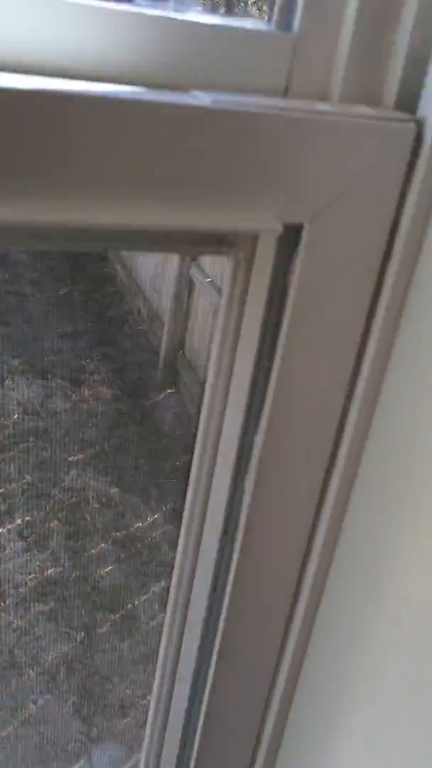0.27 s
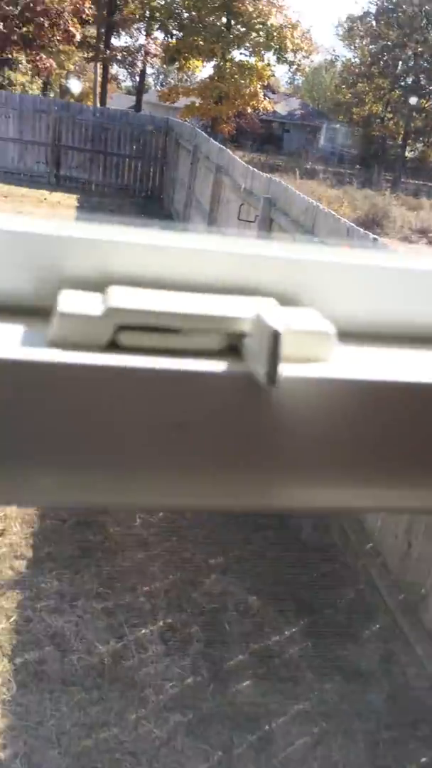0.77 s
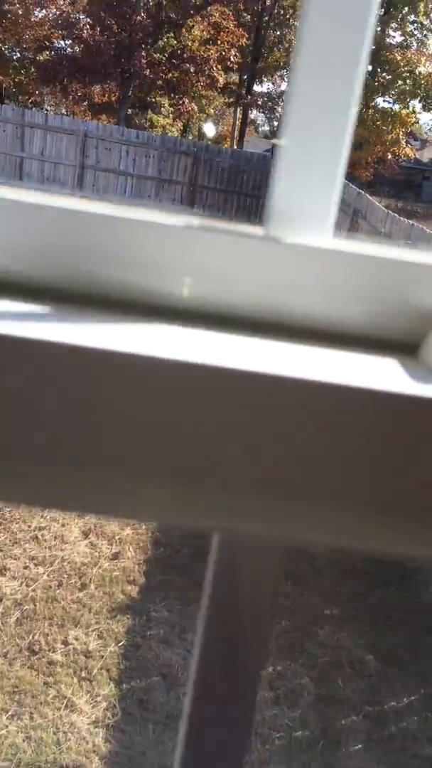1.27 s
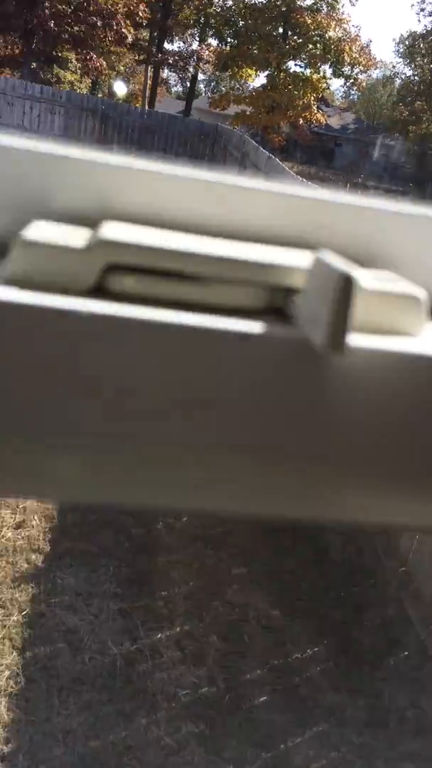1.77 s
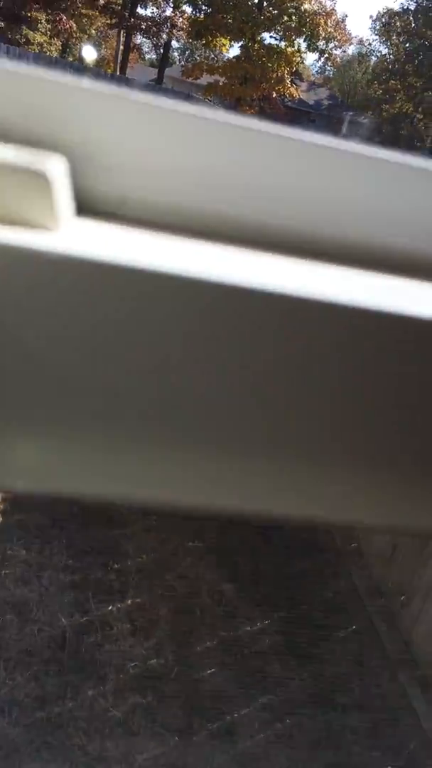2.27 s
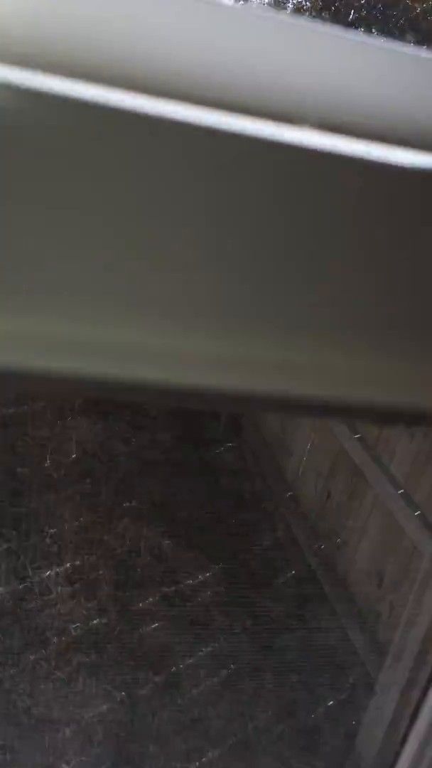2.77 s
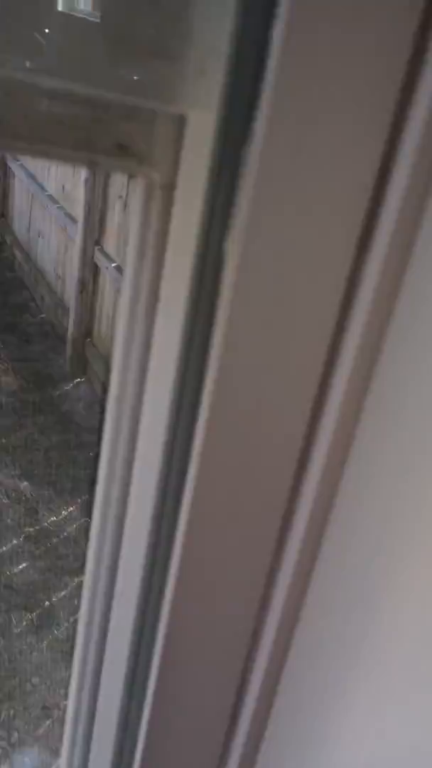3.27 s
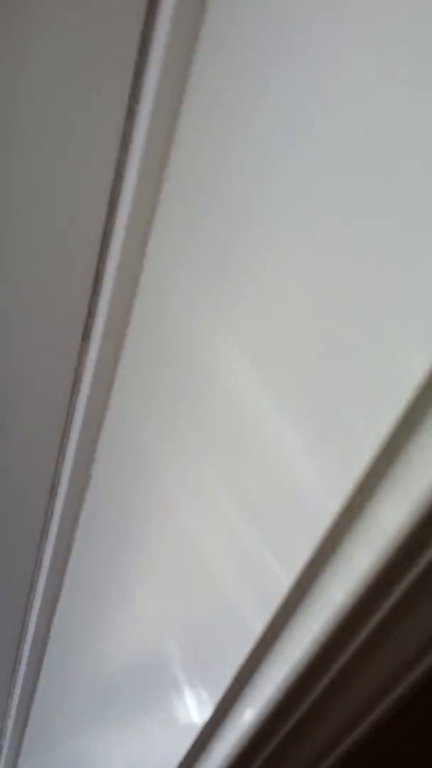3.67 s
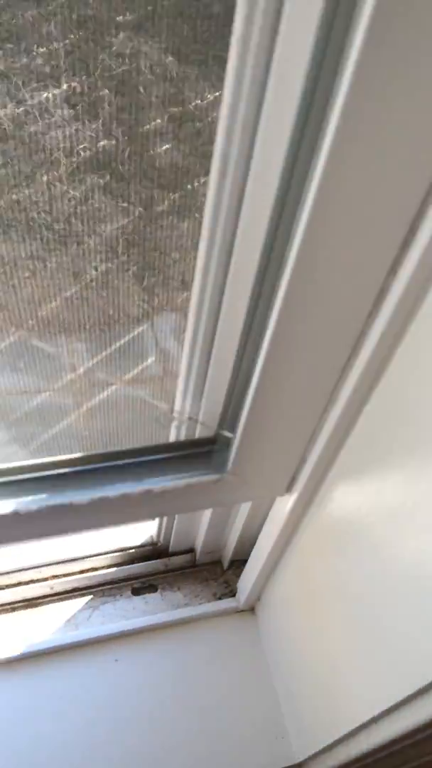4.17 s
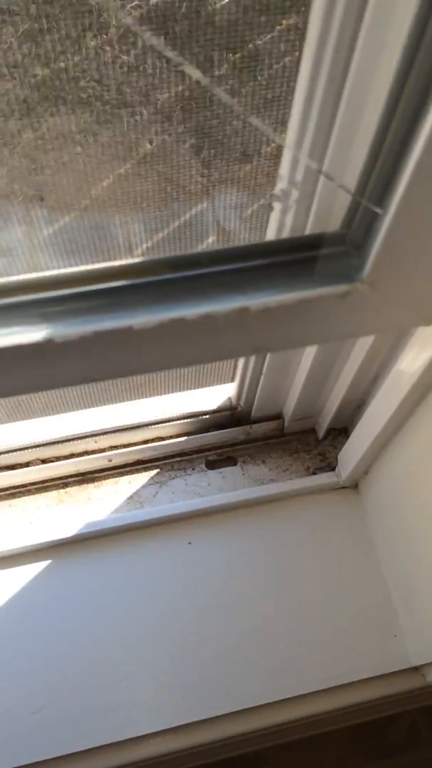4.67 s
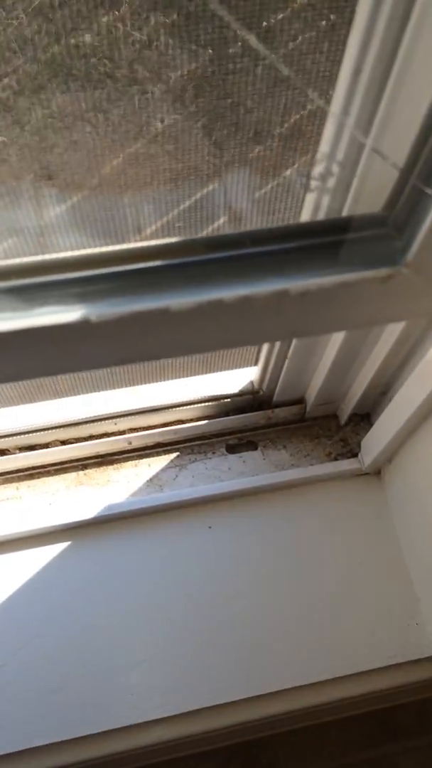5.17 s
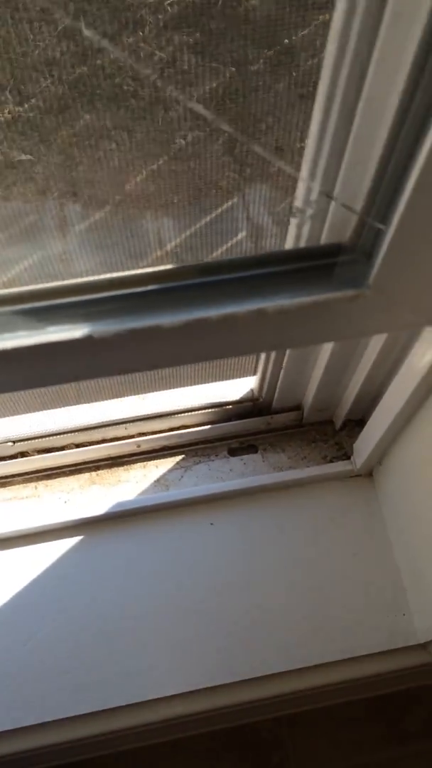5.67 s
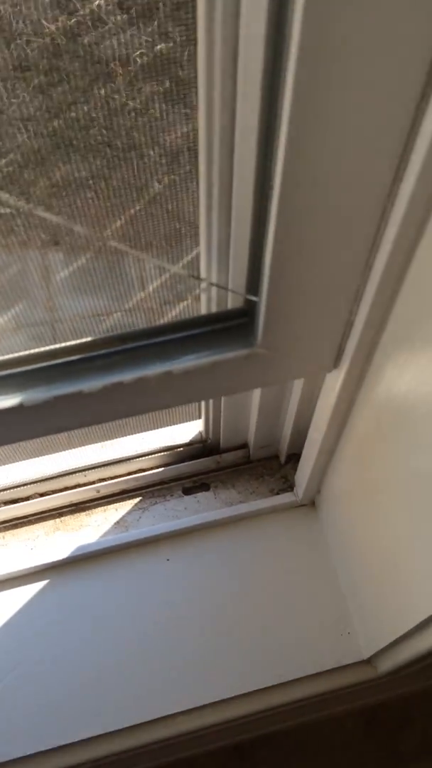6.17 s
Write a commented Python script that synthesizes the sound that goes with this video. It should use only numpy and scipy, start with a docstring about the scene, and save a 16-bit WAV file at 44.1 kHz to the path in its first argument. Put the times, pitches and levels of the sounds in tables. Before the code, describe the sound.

A vinyl sash window is opened by hand, heard close up in a small room over a faint appliance hum and distant traffic. A tiny tick comes at 0.7 seconds and a light click at 1.5, with soft rubs of hand and sleeve. The latch clacks sharply at about 1.9 seconds, followed by smaller clicks and a hard double knock near 2.7. Around 2.9 to 3 seconds the tight sash breaks free in the loudest cluster of knocks, shuddering briefly while the glass rings faintly. It slides along its track with a soft, hissing scrape from 3 to 3.8 seconds, knocking once at 3.6 and stopping with a gentle bump. Then the room is nearly quiet, the traffic murmur slightly fuller than at first. A light click and a soft thump of the pane come around 5.6 seconds, and a few more ticks at 6.2.

```python
"""Opening a sash window

A vinyl sash window is worked by hand in a small room, heard close up and in mono. The latch clicks and
the sash knocks free: each impact excites the resonances of frame, glass and room. Friction gives the
rest of the motion its sound: the sash shudders, its brush seal hisses along the track, and it bumps to
rest. Light ticks of the frame follow. Behind it an appliance hums and distant traffic murmurs."""
import sys
import numpy as np
from scipy import signal
from scipy.fft import rfft, irfft
from scipy.io import wavfile

SR = 44100
rng = np.random.default_rng(int(sys.argv[2]) if len(sys.argv) > 2 else 0)


def waveform_to_disk(signal):
    """Save audio, clipped to [-1, 1], as 16-bit WAV at the path in sys.argv[1]."""
    frames = np.transpose(np.atleast_2d(signal))
    scaled = np.clip(frames, -1, 1) * 32767
    samples = np.round(scaled).astype(np.int16)
    wavfile.write(sys.argv[1], SR, samples)


N = 282681
TIME = np.arange(N) / SR

# noise spectra, each (frequency [Hz], relative spectral density [dB])
AIR_SPECTRUM = [(50, 3), (100, 2.5), (200, 0.5), (260, -6), (350, -4), (600, -14.5), (1100, -19.5),
                (1450, -16.5), (2400, -24), (4200, -27.5), (5300, -26), (6700, -29), (9000, -32.5),
                (15000, -36)]   # still room air
TRAFFIC_SPECTRUM = [(90, -2), (200, 1), (300, -4.5), (500, -11), (720, -10), (900, -19.5), (1200, -35)]   # distant traffic
RUB_SPECTRUM = [(800, 4), (2500, -1.5), (6000, -3), (10500, -7), (12500, -9.5), (15000, -11)]   # light rubs and the closing burst
BOLT_SPECTRUM = [(200, 5.5), (400, 4.5), (850, 5), (1800, 0.5), (4000, -6.5), (10000, -7.5), (15000, -8)]   # latch bolt in its slot
CREEP_SPECTRUM = [(300, 6.5), (480, 6), (800, 3.5), (1500, -3), (3400, -6.5), (7000, -19)]   # tight sash giving way
SHUDDER_SPECTRUM = [(60, -3), (180, 3), (400, 2), (600, -6), (1000, -0.5), (2000, -7), (4000, -18.5)]   # loose sash shaking
SCRAPE_SPECTRUM = [(400, -7), (800, -1.5), (1300, 3), (2600, 3.5), (4500, 2), (7000, -13.5)]   # sash on its track
BRISTLE_SPECTRUM = [(3000, -7), (4500, -3.5), (7000, -1), (10000, -1.5), (12500, -3.5), (15000, -6)]   # brush seal
# motor and mains hum: (frequency [Hz], rms level [dB])
HUM_PARTIALS = [(48.5, -62.5), (59.3, -64.5), (147, -78), (195, -70), (294.5, -70.5), (365.5, -74.5),
                (414, -81.5), (472, -81.5), (1302, -85.5), (1833, -87), (5028, -91), (12532, -99.5)]
# spells of whining: (start [s], end [s], frequency [Hz], rms level [dB])
WHINE_SPELLS = [(0, 0.419, 1895, -74.5), (1.2, 2.401, 1885, -78.5), (3.501, 3.922, 1895, -77.5),
                (5.902, 6.4, 1898, -81.5), (.6, 1.05, 1477, -79.5), (3.7, 4.7, 1477, -78),
                (5.802, 6.302, 1486, -77.5)]
# gain of the reverberation: (frequency [Hz], gain [dB])
REVERB_GAIN = [(100, 4.5), (300, 7.5), (600, -7.5), (1300, -5.5), (3300, -10), (6000, -14.5),
               (14000, -12.5)]
# reverberation time: (frequency [Hz], time to fall 60 dB [s])
REVERB_T60 = [(100, 0.22), (400, 0.92), (1500, 0.27), (4000, 0.38), (8000, 0.2), (14000, 0.277)]
# light rubs of hand and sleeve; the last row is a brief burst of noise at the very end:
# (start [s], end [s], level [dB])
LIGHT_RUBS = [(0, 0.067, -72.5), (0.568, 0.762, -68.5), (1.48, 1.655, -64), (1.77, 1.777, -71.5),
              (1.884, 2.03, -65.5), (2.217, 2.23, -72), (2.454, 2.638, -64), (5.42, 5.559, -74),
              (5.623, 5.652, -65.5), (6.005, 6.08, -67.5), (6.21, 6.254, -72), (6.409, 6.41, -54)]
# long, faint modes of the glass: (frequency [Hz], bandwidth [Hz], gain [dB])
GLASS_MODES = [(335, 8, 9), (455, 5, 15), (717, 7, 3), (985, 9, -2), (1315, 12, -6), (1883, 12, -5),
               (3333, 14, -6)]
# soft bumps of the pane: (time [s], level [dB], frequency [Hz], time to fall 60 dB [s])
PANE_BUMPS = [(2.098, -40.5, 117, 0.08), (3.029, -34.5, 77.6, 0.078), (3.59, -36, 275, 0.1),
              (3.812, -37.5, 136, 0.063), (5.678, -36, 115, 0.068)]
# resonances and dips of the hollow frame: (frequency [Hz], bandwidth [Hz], gain [dB])
FRAME_RESONANCES = [(1320, 150, 3), (1920, 180, 3), (2310, 150, 2), (3330, 140, 3.5), (3720, 200, 2.5),
                    (4400, 300, -3), (5000, 220, 3), (5650, 400, -3), (6450, 300, 2.5), (8200, 500, 3)]
# thud, knock, clack, crack and snap bands of an impact: (lower edge [Hz], upper edge [Hz])
IMPACT_BANDS = [(120, 600), (600, 1200), (1200, 2600), (2600, 6500), (6500, 14500)]
# band balance of a firm knock and a light tick: (thud [dB], knock [dB], clack [dB], crack [dB], snap [dB])
FIRM_BALANCE = (-6, -1, 2, 1.5, -16)
LIGHT_BALANCE = (0.5, 2, -1, -4, -14)
# a harder contact trades thud for snap: (change in each band [dB per dB of hardness])
TILT_PER_HARDNESS = (-1.27, -0.78, 0, 1.11, 2)
# knocks and ticks of latch, sash and frame:
# (time [s], strength [dB], hardness [dB], lower ring [Hz], upper ring [Hz], chatter time [s])
IMPACTS = [(0.6664, -25, 6.5, 1500, 3050, 0.0017), (1.4705, -12, 3.5, 1000, 3550, .005),
           (1.541, -19.5, -3.5, 1040, 2780, 0.0022), (1.8985, -11.5, -0.5, 1500, 5970, 0.0059),
           (1.9263, 2.5, -2.6, 1370, 1760, .004), (1.9351, -7, -5.5, 1000, 1500, 0.0032),
           (1.9593, -7.5, 8.5, 1190, 4600, 0.00038), (1.9619, -4, -3, 950, 4560, 0.0023),
           (2.216, -22, 1.8, 1880, 5570, 0.0037), (2.434, -27, -4, 1000, 4540, 0.0037),
           (2.451, -11.5, -3.5, 1310, 2600, 0.0041), (2.504, -26, 3, 1500, 5100, .003),
           (2.6544, -.5, -0.5, 1582, 3290, 0.0065), (2.6673, 0.5, 0.74, 1530, 4620, 0.0022),
           (2.671, -4.5, .3, 1618, 3230, .0055), (2.9168, -7.5, -1, 1240, 3345, 0.008),
           (2.929, -7.5, -4.5, 1300, 3000, 0.0083), (2.9466, 5, 1.5, 1180, 3280, 0.0049),
           (2.9486, 9, 3.5, 1910, 3700, 0.002), (2.981, 4.5, 1, 2300, 4170, 0.003),
           (2.985, 2, 3, 1090, 5800, .003), (2.998, -1.5, -3, 730, 3230, 0.01),
           (3.0337, -5.5, -2.5, 1010, 2760, 0.012), (3.5799, -7.5, -5.5, 1930, 2460, 0.0057),
           (3.809, -22.5, -8, 1050, 2705, 0.0039), (4.243, -29, -8, 750, 2700, .004),
           (4.272, -32, 0, 1490, 5030, .0063), (5.6106, -13.5, -1.3, 800, 2960, 0.0021),
           (5.719, -19.5, -1.5, 2190, 4220, 0.0058), (6.208, -15.5, -3.5, 910, 4130, 0.0023),
           (6.218, -19, -3, 1520, 3000, .004), (6.248, -24, -0.5, 1510, 3030, .0087)]
# speed of the sash, as the level of its hiss: (time [s], relative level [dB])
SASH_SPEED = [(3.03, -48), (3.152, -46.5), (3.378, -51.5), (3.702, -52), (3.766, -54.5), (3.824, -69),
              (3.86, -75.5)]


def from_db(db):
    """Amplitude ratio of a level in decibels."""
    return 10 ** (np.asarray(db) / 20)


def at_hz(curve, hz):
    """Interpolation on a logarithmic frequency axis."""
    frequencies, values = np.transpose(curve)
    return np.interp(np.log(hz), np.log(frequencies), values)


def band(x, low, high, order=2):
    """Butterworth band-pass filtering, with edges in hertz."""
    sections = signal.butter(order, [low, min(high, .47 * SR)], "band", fs=SR, output="sos")
    return signal.sosfilt(sections, x)


def resonance(x, hz, width, db):
    """A second-order resonance lifts or hollows one region of the spectrum."""
    cosine, gain = np.cos(2 * np.pi * hz / SR), from_db(db)
    k = np.pi * width / SR
    return signal.lfilter([1 + k * gain, -2 * cosine, 1 - k * gain], [1 + k, -2 * cosine, 1 - k], x)


def unit_rms(x):
    """Normalisation to unit power."""
    return x / np.sqrt(np.mean(x ** 2) + 1e-20)


def noise(spectrum):
    """Spectral shaping of white noise, at unit power and rolled off beyond the ends of the table."""
    hz = np.arange(N // 2 + 1) * SR / N + 0.00088
    low, high = spectrum[0][0], spectrum[-1][0]
    roll_off = 1 / np.sqrt((1 + (.8 * low / hz) ** 8) * (1 + (.8 * hz / high) ** 8))
    white = rfft(rng.standard_normal(N))
    return unit_rms(irfft(white * from_db(at_hz(spectrum, hz)) * roll_off, N))


def drift(rate_hz):
    """Random modulation: Gaussian values joined by straight lines."""
    return np.interp(TIME * rate_hz, np.arange(4096), rng.standard_normal(4096))


def friction(spectrum, db, grain_db, grain_hz):
    """Uneven rubbing contact gives noise whose level fluctuates at random."""
    return from_db(db + grain_db * drift(grain_hz)) * noise(spectrum)


def swell(start_s, end_s, rise_s, fall_s):
    """Exponential growth and decay about a hold; rise and fall are the times for 60 dB."""
    away = np.maximum(start_s - TIME, 0) / rise_s + np.maximum(TIME - end_s, 0) / fall_s
    return from_db(-60 * np.minimum(away, 3))


def tone(hz):
    """A sinusoid of unit power with slight random phase modulation."""
    return np.sqrt(2) * np.sin(2 * np.pi * (hz * TIME + rng.random()) + .12 * drift(4))


def air_and_traffic(air_db=-60.5, traffic_rise_s=(1.95, 2.9), traffic_db=(-69.5, -58.5)):
    """Ambient noise: over steady air, distant traffic swells while latch and sash are worked loose."""
    air = from_db(air_db) * noise(AIR_SPECTRUM)
    traffic = from_db(np.interp(TIME, traffic_rise_s, traffic_db)) * noise(TRAFFIC_SPECTRUM)
    return air + traffic


def appliance():
    """Superposed tones: a motor beats against the mains hum."""
    return sum(from_db(db) * tone(hz) for hz, db in HUM_PARTIALS)


def whines(fade_s=2.5):
    """Slow amplitude modulation: two faint whines swell and fade across the room."""
    return sum(from_db(db) * swell(start, end, fade_s, fade_s) * tone(hz)
               for start, end, hz, db in WHINE_SPELLS)


def room(x, first_echo_s=0.0017, build_s=0.0059):
    """Reverberation: a diffuse field builds after the first echo and lasts longest in the low middle."""
    t, response = TIME[:SR], 0
    onset = 1 - np.exp(-np.maximum(t - first_echo_s, 0) / build_s)
    edges = np.geomspace(60, 16000, 13)
    for low, high in zip(edges, edges[1:]):
        hz = np.sqrt(low * high)
        decay = from_db(-60 * t / at_hz(REVERB_T60, hz))
        tail = band(rng.standard_normal(SR), low, high, order=3) * onset * decay
        gain = from_db(at_hz(REVERB_GAIN, hz)) * np.sqrt(2 * (high - low) / SR)
        response = response + gain * tail / np.linalg.norm(tail)
    return signal.fftconvolve(x, response)[:N]


def rubs():
    """Light friction of hand and sleeve; a brief burst of the same noise sounds at the very end."""
    envelope = sum(from_db(db) * swell(start, end, rise_s=.14, fall_s=.74)
                   for start, end, db in LIGHT_RUBS)
    return envelope * friction(RUB_SPECTRUM, db=0, grain_db=2, grain_hz=90)


def glass(blows):
    """Modal resonance: the glass rings on faintly after each blow."""
    ringing = 0
    for hz, width, db in GLASS_MODES:
        radius = np.exp(-np.pi * width / SR)
        poles = [1, -2 * radius * np.cos(2 * np.pi * hz / SR), radius ** 2]
        ringing += from_db(db) * signal.lfilter([1 - radius, 0, radius - 1], poles, blows + 1e-18)
    return ringing


def pane(rise_s=0.002):
    """Damped free vibration: the heavy pane swings briefly after a push."""
    bumps = 0
    for start, db, hz, t60 in PANE_BUMPS:
        t = np.maximum(TIME - start, 0)
        envelope = from_db(db - 60 * np.minimum(t / t60, 3)) * (1 - np.exp(-t / rise_s))
        bumps = bumps + envelope * np.sin(2 * np.pi * hz * t)
    return bumps


def bolt(spread_db=-13):
    """Dry friction: the latch bolt rasps in its slot. Rows: direct sound, feed to glass and room."""
    envelope = swell(1.9125, 1.92, rise_s=.011, fall_s=.04)
    rasp = envelope * friction(BOLT_SPECTRUM, db=-33.5, grain_db=3, grain_hz=900)
    return np.array([rasp, rasp * from_db(spread_db)])


def creep():
    """Frictional creep: the tight sash grinds dully as it starts to give under the push."""
    envelope = swell(2.7, 2.92, rise_s=.11, fall_s=.091)
    return envelope * friction(CREEP_SPECTRUM, db=-55.5, grain_db=1.5, grain_hz=150)


def shudder():
    """Intermittent contact: the loose sash rattles in the frame as it comes free."""
    envelope = swell(2.99, 3.068, rise_s=.04, fall_s=.64)
    return envelope * friction(SHUDDER_SPECTRUM, db=-41, grain_db=1.5, grain_hz=110)


def chatter_force(decay_s, rise_s=.0002, settle=.04, settle_s=.012, uneven_db=3):
    """Broadband excitation: a dying burst of uneven micro-collisions has a nearly flat spectrum."""
    t = TIME[:4096]
    envelope = (np.exp(-t / decay_s) + settle * np.exp(-t / settle_s)) * (1 - np.exp(-t / rise_s))
    collisions = rng.standard_normal(len(t)) * from_db(uneven_db * rng.standard_normal(len(t)))
    spectrum = rfft(collisions * envelope)
    whitened = irfft(spectrum / (np.abs(spectrum) + 1e-12))
    return whitened * np.minimum(1, 2 * np.sqrt(envelope))


def impact(levels_db, lower_hz, upper_hz, chatter_s, low_stretch=1.61):
    """A blow excites resonances of frame and struck part; lows die last, a soft contact loses treble."""
    crack_db, snap_db = levels_db[-2:]
    cutoff_hz = np.clip(9200 * from_db((snap_db - crack_db + 16.5) / 2), 3000, 18000)
    softness = signal.butter(4, cutoff_hz, fs=SR, output="sos")
    struck_part = [(lower_hz, 260, 9.5), (upper_hz, 400, 11.5)]   # columns as for the frame
    blow = 0
    for db, (low, high) in zip(levels_db, IMPACT_BANDS):
        force = chatter_force(chatter_s * (low_stretch if high <= 1200 else 1))
        body = signal.sosfilt(softness, band(force, low, high, order=5))
        for hz, width, gain_db in FRAME_RESONANCES + struck_part:
            body = resonance(body, hz, width, gain_db)
        gain = from_db(db) * np.sqrt(2 * (high - low) / SR)
        blow = blow + gain * body / np.linalg.norm(body)
    return blow


def knocks(light_to_firm_db=(-13.5, -5.5), usual_chatter_s=.0036):
    """Impacts, coloured by strength and hardness. Rows: direct sound, feed to glass and room."""
    paths = np.zeros((2, N))
    for start, db, hardness_db, lower_hz, upper_hz, chatter_s in IMPACTS:
        at = int(start * SR)
        firmness = np.interp(db, light_to_firm_db, (0, 1))
        balance_db = firmness * np.array(FIRM_BALANCE) + (1 - firmness) * np.array(LIGHT_BALANCE)
        levels_db = db + balance_db + hardness_db * np.array(TILT_PER_HARDNESS)
        blow = impact(levels_db, lower_hz, upper_hz, chatter_s)[:N - at]
        spread_db = -1 + 2 * np.log2(chatter_s / usual_chatter_s)   # long chatter shakes more window
        paths[:, at:at + len(blow)] += [blow, blow * from_db(spread_db)]
    return paths


def slide(swish_db=-1.5, swish_growth=.9, squeak_db=-58, squeak_at_s=3.45):
    """Sliding friction grows with speed: seal bristles hiss and the track scrapes, squeaking once."""
    times, speed_db = np.transpose(SASH_SPEED)
    speed = from_db(np.interp(TIME, times, speed_db)) * swell(3.01, 3.81, rise_s=.1206, fall_s=.14)
    hiss = friction(BRISTLE_SPECTRUM, db=1, grain_db=1, grain_hz=360)
    swish_gain = from_db(swish_db) * (speed / speed.max()) ** swish_growth
    swish = swish_gain * unit_rms(band(rng.standard_normal(N), 5000, 9200))
    scrape = friction(SCRAPE_SPECTRUM, db=-4, grain_db=2, grain_hz=150)
    squeak_gain = from_db(squeak_db) * np.exp(-((TIME - squeak_at_s) / 0.02) ** 2)
    squeak = squeak_gain * unit_rms(band(rng.standard_normal(N), 2480, 2520))
    return speed * (hiss + swish + scrape) + squeak


def scene():
    """Superposition of window, reverberation and background, alike in both channels."""
    direct, spread = knocks() + bolt()
    blows = direct + glass(spread) + room(spread) + pane()
    rubbing = creep() + slide() + shudder() + rubs()
    background = air_and_traffic() + appliance() + whines()
    mono = blows + rubbing + background
    return np.array([mono, mono])


def record(dry, cutoff_hz=15400):
    """Band limiting: a steep elliptic low-pass removes the highest treble."""
    return signal.sosfilt(signal.ellip(10, .2, 70, cutoff_hz, fs=SR, output="sos"), dry)


dry = scene()
out = record(dry)
waveform_to_disk(out)
```